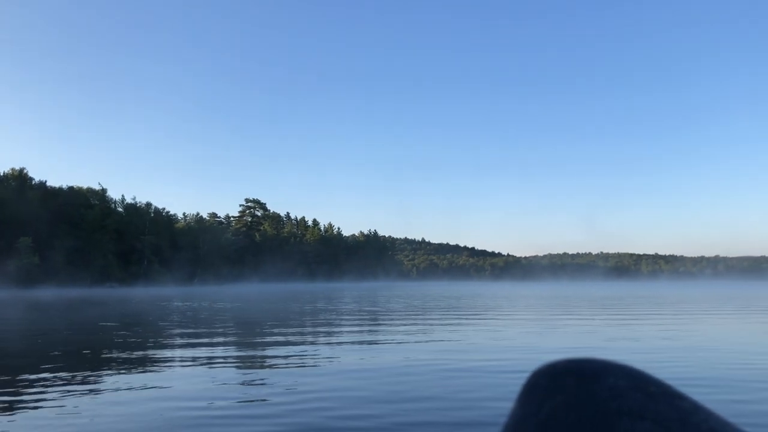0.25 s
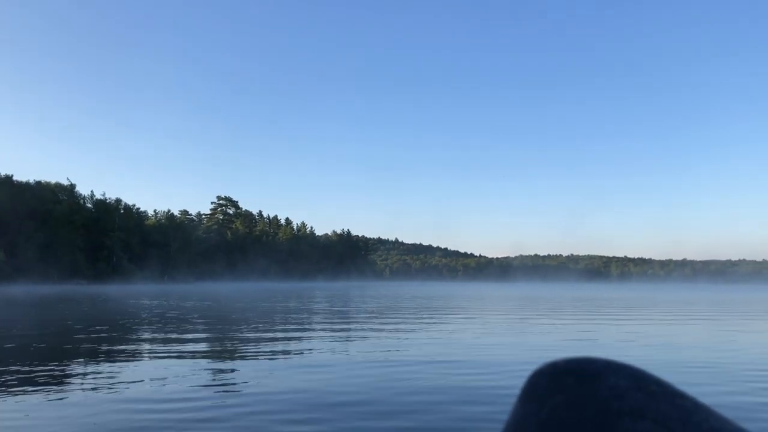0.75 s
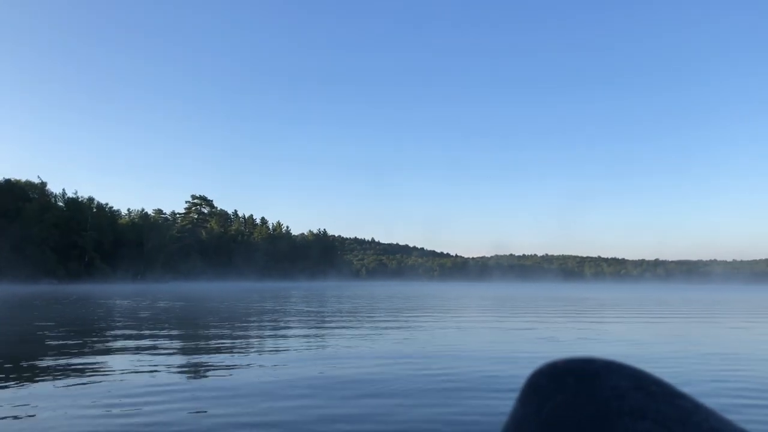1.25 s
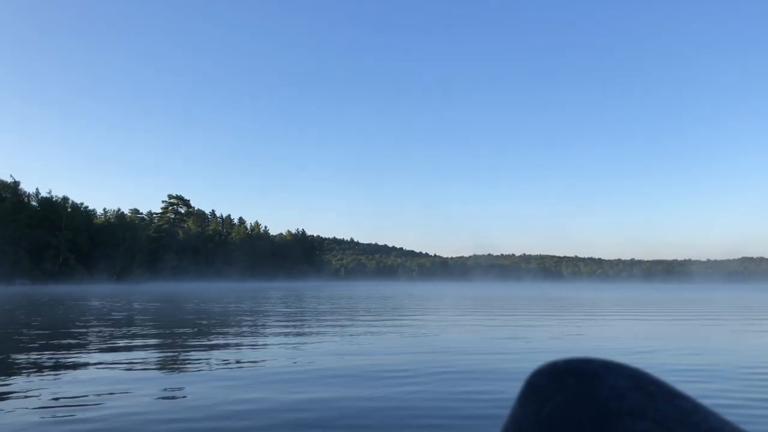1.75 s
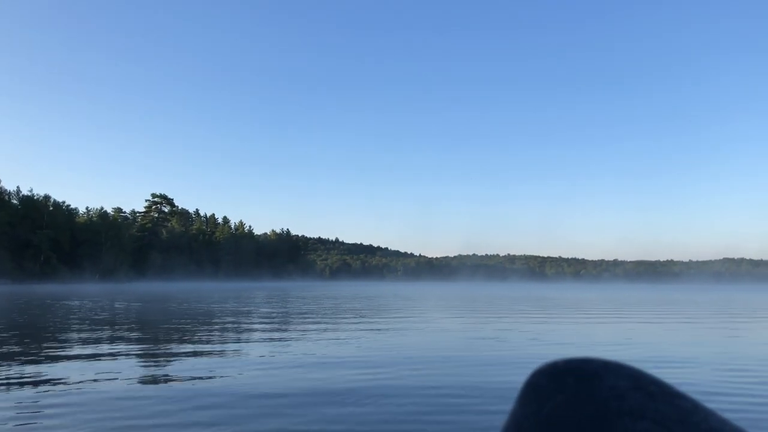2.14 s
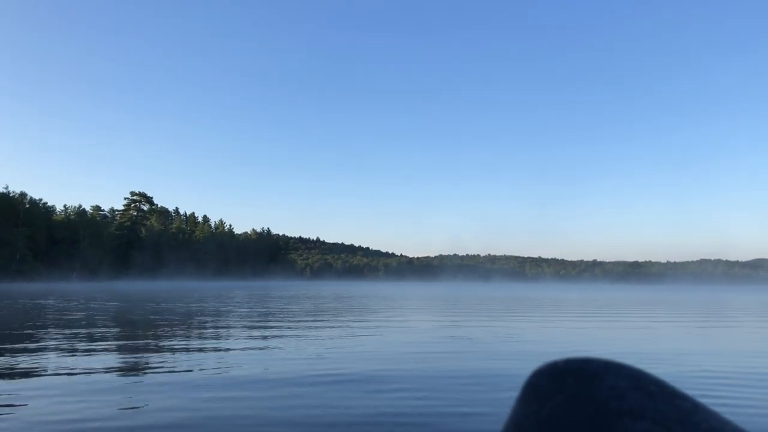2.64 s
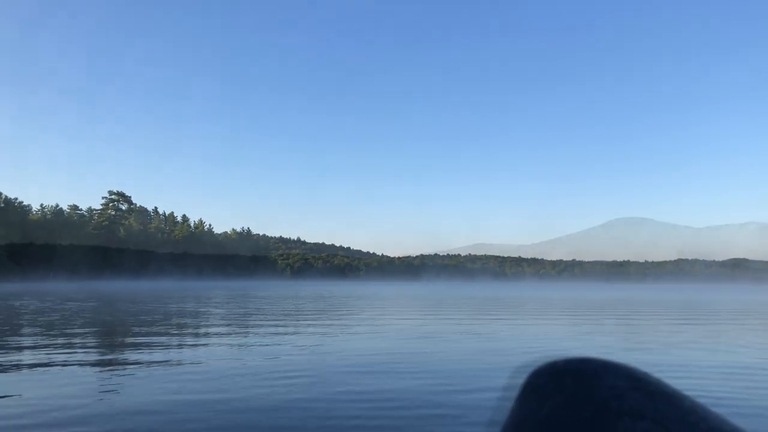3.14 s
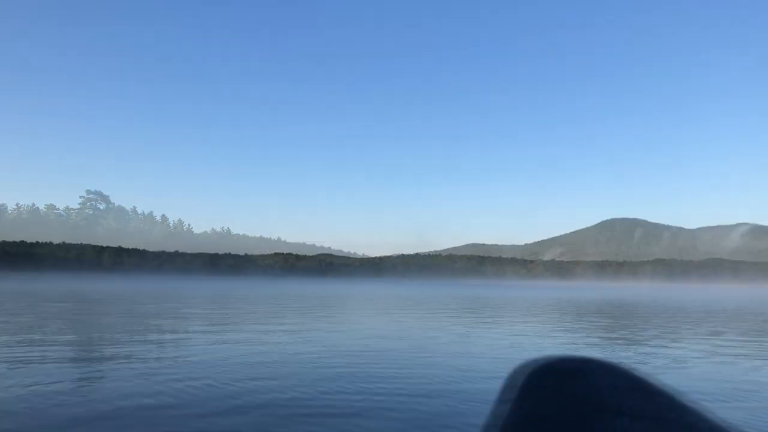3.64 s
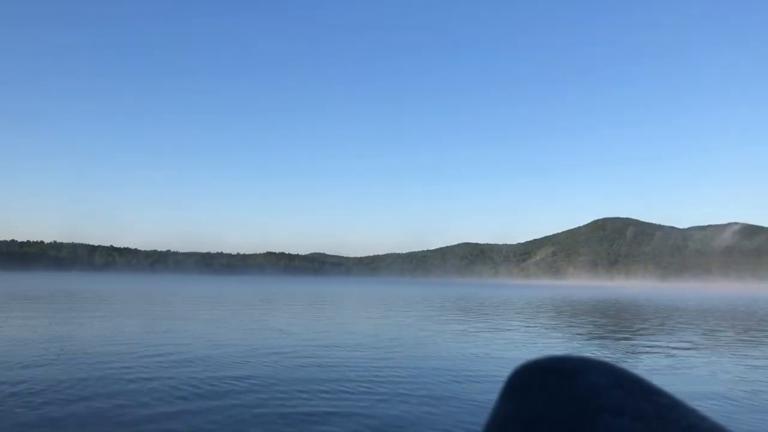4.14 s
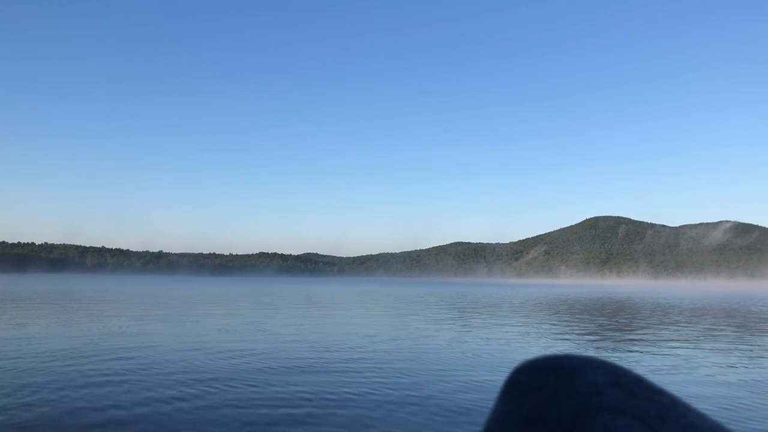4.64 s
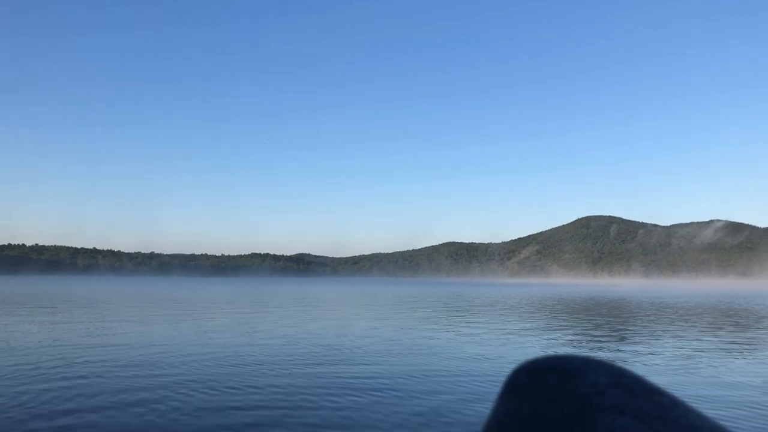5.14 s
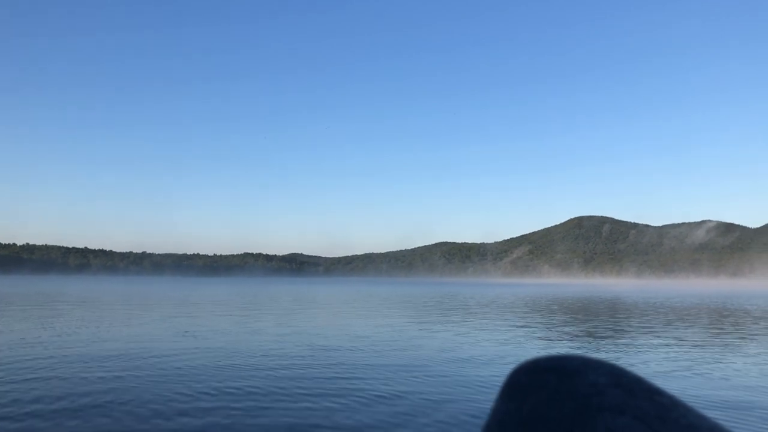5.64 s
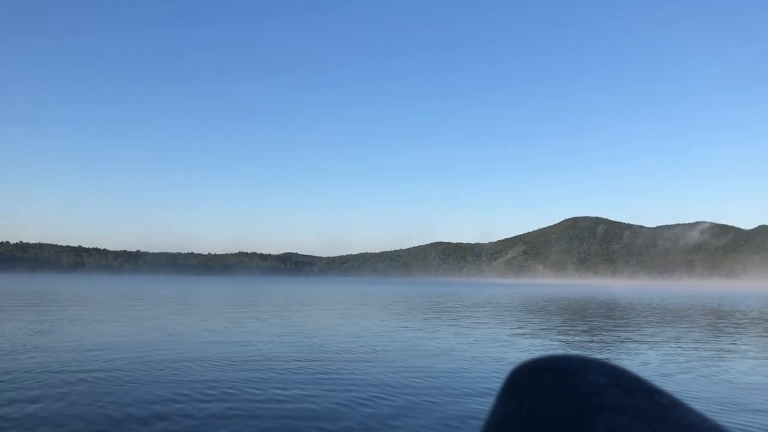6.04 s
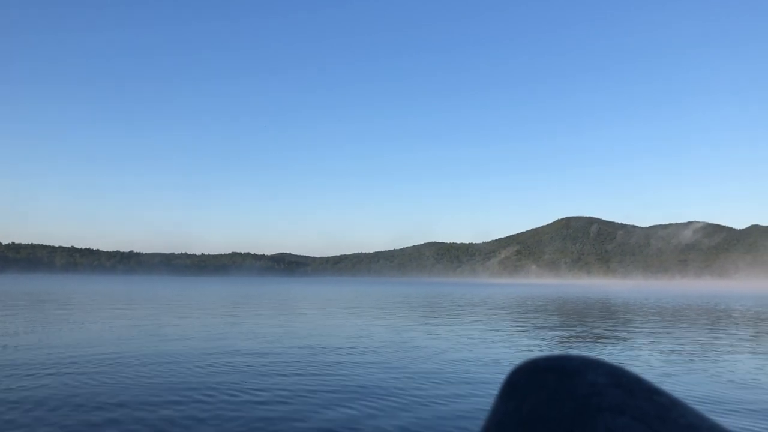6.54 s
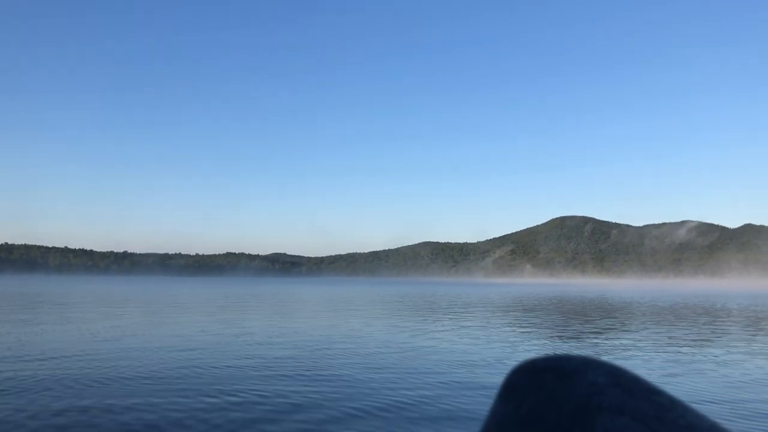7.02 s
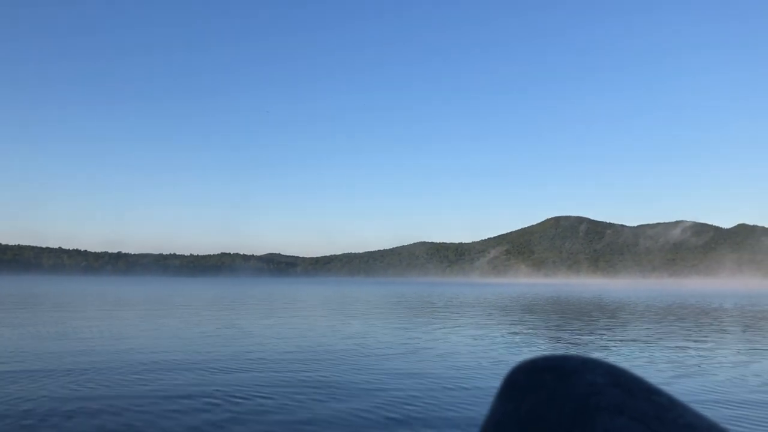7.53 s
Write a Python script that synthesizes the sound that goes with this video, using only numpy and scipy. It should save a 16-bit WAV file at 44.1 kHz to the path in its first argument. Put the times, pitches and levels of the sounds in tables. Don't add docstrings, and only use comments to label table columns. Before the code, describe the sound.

Distant loon tremolos and soft hull gurgles on a quiet lake, a lull, then close, yelping, laughing-like loon calls echoing from the wooded shore.

```python
import sys
import numpy as np
from scipy import signal
from scipy.fft import rfft, irfft, next_fast_len
from scipy.io import wavfile
from scipy.ndimage import uniform_filter1d, map_coordinates

SR = 44100
rng = np.random.default_rng(int(sys.argv[2]) if len(sys.argv) > 2 else 0)


def master(y):
    cut = np.clip(np.atleast_2d(y).T, -1, 1)
    pcm = np.round(cut * 32767)
    wavfile.write(sys.argv[1], SR, pcm.astype(np.int16))


def how_loud(loudness_db):
    steps = np.asarray(loudness_db, float) / 20
    return 10 ** steps


N = 343098

# t/s, f/Hz, level/dB, 2nd partial below it/dB
FAR_CALLS = [
    [(0, 1270, -44.5, -23), (.11, 1255, -53, -22), (.19, 1226, -56.5, -22), (.27, 1085, -70, -21)],
    [(.627, 1280, -53, -13), (.72, 1320, -53.5, -19.5), (.87, 1309, -56.5, -24), (.95, 1285, -67.5, -10),
     (1.11, 1296, -53.5, -23), (1.19, 1280, -55, -27), (1.26, 1265, -62, -22), (1.34, 1230, -58, -27),
     (1.38, 1180, -66, -16)],
    [(1.83, 1265, -62, -18), (1.98, 1293, -67, -12), (2.06, 1276, -52, -21), (2.15, 1233, -60, -8.5),
     (2.23, 1160, -59.5, -13), (2.33, 1090, -70, -12)],
]
# t/s, f/Hz, level/dB, 2nd partial below it/dB, throat resonance f/Hz
NEAR_CALLS = [
    [(4.574, 1375, -38.5, -31, 3900), (4.68, 1433, -36, -37, 4600), (4.83, 1423, -36.5, -43, 4480),
     (4.91, 1425, -36, -44, 4680), (4.98, 1401, -41.5, -34, 4600), (5.13, 1306, -43.5, -32, 4100),
     (5.166, 1242, -52, -30, 4000)],
    [(5.559, 1410, -37, -31, 4360), (5.76, 1426, -36, -33.5, 3940), (5.95, 1410, -34.8, -29.5, 3640),
     (6.03, 1399, -34.5, -40, 3400), (6.13, 1392, -36.5, -25.5, 3420), (6.21, 1382, -38.5, -32.5, 3570),
     (6.3, 1310, -42, -38, 3620), (6.36, 1208, -45.5, -44, 3580), (6.378, 1115, -60, -28, 3600)],
    [(6.701, 1366, -40.5, -18, 4180), (6.79, 1410, -37, -22, 4340), (6.94, 1418, -33.5, -33, 4770),
     (7.09, 1378, -37, -27, 4380), (7.18, 1359, -37, -24, 3470), (7.31, 1296, -39, -31, 3420),
     (7.37, 1133, -48, -33, 3417), (7.422, 1110, -50, -31, 3300)],
]
# t of one dip/s, waver period/s, t the beak opens/s
WAVER_TIMES = [
    (.068, .077, .3),
    (.676, .0783, 1.4),
    (1.945, .0818, 2.3),
    (4.645, .0746, 5.17),
    (5.578, .0739, 6.295),
    (6.752, .0751, 7.19),
]
# dip depth/dB, slack pitch f/Hz
WAVER_DEPTHS = [(9.5, 1040), (14, 1110), (11, 1050), (10.5, 1125), (8.5, 1130), (6.5, 1125)]
# t/s, level/dB
LINGER_LEVEL = [(0, -63), (.22, -60), (.45, -68), (.8, -65), (1.26, -60), (1.74, -66.5), (2.1, -63),
                (2.7, -68), (3.33, -71.5), (3.75, -82.5), (4.0, -100)]
# f/Hz, level per Hz/dB
LINGER_COLOUR = [(620, -27.5), (1050, -14), (1210, 8.5), (1290, 11), (1360, 5), (1440, -34), (1500, -25),
                 (1950, -51), (3300, -120)]
# t/s, level/dB
WATER_STIR = [(0.0, -58.5), (0.17, -57.5), (0.91, -61), (1.9, -57.5), (3.07, -63.5), (3.1, -61),
              (3.59, -69.5), (4.12, -65), (4.16, -69), (4.48, -66.5), (7.65, -67), (7.78, -67)]
# f/Hz, level per Hz/dB
HULL_COLOUR = [(25, -38), (45, -18), (70, -2), (110, -6.5), (160, -13.5), (300, -41), (600, -120)]
# f/Hz, level per Hz/dB
SWELL_COLOUR = [(12, -51), (25, -23.5), (35, -8.5), (48, -4), (65, 1), (100, -35), (200, -120)]
# f/Hz, level per Hz/dB
GURGLE_COLOUR = [(50, -43), (90, -11.5), (160, 1.5), (230, -1.5), (310, -2), (420, -8), (700, -42),
                 (1400, -120)]
# f/Hz, level per Hz/dB
WASH_COLOUR = [(100, -120), (200, -32.5), (350, 0), (500, -0.5), (630, 0), (780, -2.5), (1000, -9),
               (1400, -17.5), (2500, -30.5), (6000, -120)]
# t/s, level/dB
HISS_LEVEL = [(0, -69.5), (3.1, -69.5), (3.55, -73), (4.1, -70), (7.78, -69.5)]
# f/Hz, level per Hz/dB
HISS_COLOUR = [(300, -25), (600, -16.5), (1000, 9), (1700, 5), (2500, 5.5), (5000, 2), (10200, -3),
               (11400, -3), (14300, -4.5), (15050, 3), (15400, -9), (17000, -14.5)]
# delay/s, rise/s, t60/s, level/dB, treble edge f/Hz, pitch drop f/Hz of shores the bird flies away from
SHORE_ECHOES = [
    (0.0043, 0.0033, 0.069, -19, 5800, 2),
    (0.426, 0.02, 0.38, -23, 2400, -1),
    (0.4, .1, 4.5, -26.5, 1970, 1),
    (0.24, 0.19, 4.5, -25.5, 1420, 94.5),
]
# t/s, length/s, start f/Hz, end f/Hz, level/dB
CHIRPS = [(.22, 0.02, 2420, 2480, -72), (0.277, .05, 2570, 2620, -77), (0.405, 0.049, 2630, 2710, -71.5),
          (.85, .006, 3600, 2500, -70), (.851, 0.0077, 2540, 2360, -61), (1.468, 0.015, 3780, 3690, -77),
          (1.512, 0.016, 4150, 4380, -78), (1.532, .02, 3330, 3000, -75), (1.552, .02, 2590, 2700, -72),
          (1.61, .047, 2800, 2540, -75), (1.674, .063, 2700, 2890, -76.5), (1.743, .041, 3250, 2380, -74.5),
          (1.785, 0.027, 3020, 3130, -76.5), (2.935, 0.021, 3220, 2900, -72),
          (2.954, 0.016, 2880, 3260, -70.5), (3.064, 0.055, 3480, 2560, -74),
          (3.106, 0.045, 2450, 3340, -72), (3.143, 0.045, 3270, 2200, -69), (3.324, .018, 2700, 3250, -77),
          (3.354, .03, 3230, 2700, -78), (4.34, .031, 4130, 4670, -75), (5.957, 0.028, 2230, 2640, -71),
          (6.02, 0.045, 2670, 2120, -73), (7.481, .066, 2214, 2200, -79)]
# t/s, length/s, start f/Hz, end f/Hz, peak level/dB
SHORT_YELPS = [
    (0.595, 0.037, 1370, 2080, -53.5),
    (1.792, 0.038, 1610, 1900, -60.5),
    (5.526, .034, 1529, 2115, -39.5),
    (6.676, .026, 1444, 1990, -42),
]
# t/s, f/Hz, level/dB
HELD_YELP = [(4.476, 1493, -67), (4.49, 1458, -54), (4.505, 1596, -50.5), (4.518, 1770, -43),
             (4.534, 1844, -41), (4.548, 1840, -44), (4.564, 1757, -44), (4.572, 1840, -48.5)]
# multiple of the fundamental, level/dB
YELP_PARTIALS = [(1, -17.5), (2, -1), (3, -32), (4, -27), (5, -24), (6, -31)]
# added fundamental level/dB, added overtone level/dB
YELP_TILTS = [(12, -7), (11, -7), (-4, -11), (-4, -10), (-1, -5)]
# t/s, f/Hz, length/s, peak level/dB
SLAPS = [(0.908, 92.0, 0.0047, -41.5), (1.515, 88.5, 0.021, -62), (1.824, 70.4, 0.016, -42.5),
         (2.249, 100, 0.0084, -41.5), (2.416, 69.5, 0.0072, -45), (2.489, 79, 0.0048, -38),
         (2.641, 99.0, 0.007, -54), (2.867, 70, 0.0061, -43.5), (2.91, 84.0, 0.018, -48.5),
         (3.094, 84.5, 0.0093, -49), (3.159, 70.0, 0.011, -49.6), (3.225, 87.0, 0.01, -45),
         (3.279, 100, 0.0056, -43.5), (3.356, 116, 0.013, -48.5), (3.74, 74.4, 0.0066, -46),
         (4.923, 71, 0.0055, -44.5), (7.674, 145.8, 0.013, -51.5)]
# t/s, length/s, start f/Hz, end f/Hz, level/dB
VOICE_BREAKS = [
    (4.485, .017, 2850, 3180, -73),
    (4.496, 0.015, 3150, 2600, -74),
    (4.58, 0.019, 1610, 1770, -57),
    (5.17, .007, 1863, 1510, -66),
    (5.173, 0.017, 1540, 1370, -56),
]
# t/s, f/Hz, level/dB
MOTOR_RUNS = [
    [(4.9, 69, -69), (5.66, 83.13, -67.5), (7.78, 89.55, -62.5)],
]


def unit(x):
    return x / np.sqrt(np.mean(x ** 2) + 1e-20)


def span(rows):
    s, *columns = np.transpose(rows)
    n = np.arange(max(round(s[0] * SR), 0), min(round(s[-1] * SR), N))
    return n, [np.interp(n / SR, s, column) for column in columns]


def level_curve(rows):
    s, db = np.transpose(rows)
    return np.interp(np.arange(N) / SR, s, db)


def wobble(rate):
    knots = rng.standard_normal(int(N * rate / SR) + 4)
    return map_coordinates(knots, [np.arange(N) * rate / SR])


def rush(colour, patchy_db):
    z = signal.stft(rng.standard_normal(N + 512), nperseg=512)[2]
    field = uniform_filter1d(rng.standard_normal(z.shape), size=5, axis=0)
    field = uniform_filter1d(field, size=12, axis=1)
    noise = signal.istft(z * how_loud(patchy_db * unit(field)), nperseg=512)[1]
    f, db = np.transpose(colour)
    m = next_fast_len(len(noise))
    gain = how_loud(np.interp(np.log(np.fft.rfftfreq(m, 1 / SR) + 1), np.log(f + 1), db))
    return unit(irfft(rfft(noise, m) * gain, m)[:N])


def add(out, n, hz, partials, edge):
    turn = 2 * np.pi * np.cumsum(hz) / SR
    ends = np.clip(np.minimum(n - n[0], n[-1] - n) / (edge * SR), 0, 1)
    voice = sum(how_loud(db) * np.sin(k * turn + k) for k, db in partials)
    out[n] += ends * np.sqrt(2) * voice


def resonance(hz, centre_hz, width_hz):
    return -20 * np.log10(1 + ((hz - centre_hz) / width_hz) ** 2)


def tremolos():
    level_lag_s = 0.0015
    swing, full_swing_hz = 0.6, 85
    pitch_round, level_round = 1.05, 1.25
    third_db, throat_width_hz = -27.5, 303
    fourth_db, beak_hz, beak_width_hz = -46.5, 4860, 450
    beak_open_db, beak_open_s = 15, 0.03
    out, flutter_db = np.zeros(N), 0.3 * wobble(60)
    fading_db = [2.07 * wobble(40) for _ in range(3)]
    far_throat_hz = 3770
    far = [[row + (far_throat_hz,) for row in call] for call in FAR_CALLS]
    for rows, (dip_s, period, open_s), (depth_db, slack_hz) in zip(far + NEAR_CALLS, WAVER_TIMES, WAVER_DEPTHS):
        n, (crest_hz, crest_db, second_db, throat_hz) = span(rows)
        t = n / SR
        arch = np.abs(np.sin(np.pi * (t - dip_s) / period))
        late_arch = np.abs(np.sin(np.pi * (t - dip_s - level_lag_s) / period))
        swing_hz = swing * np.maximum(crest_hz - slack_hz, 0)
        hz = crest_hz - swing_hz * (1 - arch ** pitch_round)
        hz = uniform_filter1d(hz, size=400, mode="nearest")
        sink_db = depth_db * np.minimum(swing_hz / full_swing_hz, 1) * (1 - late_arch ** level_round)
        db = uniform_filter1d(crest_db - sink_db, size=300, mode="nearest") + flutter_db[n]
        beak_db = fourth_db + beak_open_db * np.clip((t - open_s) / beak_open_s, 0, 1)
        upper = [second_db - 10 * (1 - arch),
                 third_db + resonance(3 * hz, throat_hz, throat_width_hz),
                 beak_db + resonance(4 * hz, beak_hz, beak_width_hz)]
        stack = [(j + 2, crest_db + level + fading_db[j][n]) for j, level in enumerate(upper)]
        add(out, n, hz, [(1, db)] + stack, edge=0.0014)
    return out


def linger():
    db = level_curve(LINGER_LEVEL) + 1.5 + 1.24 * wobble(25.96)
    return how_loud(db) * rush(LINGER_COLOUR, patchy_db=0.0)


def water():
    wash_db = level_curve(WATER_STIR)
    stir_db = wash_db - wash_db.mean()
    hull_db = -62 + 0.4 * stir_db
    gurgle_db = -61.5 + 0.6 * stir_db
    lap, rock = wobble(9), wobble(11)
    out = how_loud(hull_db - 2.5) * unit(how_loud(1.5 * rock) * rush(HULL_COLOUR, patchy_db=0.8))
    swell_db = hull_db + 0.8 * (wash_db + 58.5) - 4
    out += how_loud(swell_db) * unit(how_loud(3.7 * rock) * rush(SWELL_COLOUR, patchy_db=1.5))
    out += how_loud(gurgle_db + 0.5 + 0.37 * lap + 0.2 * rock) * rush(GURGLE_COLOUR, patchy_db=0.53)
    out += how_loud(wash_db + 0.17 * lap) * rush(WASH_COLOUR, patchy_db=1.56)
    return out


def air():
    return how_loud(level_curve(HISS_LEVEL)) * rush(HISS_COLOUR, patchy_db=0.3)


def shore(birds):
    t, out = np.arange(3 * SR) / SR, np.zeros(N)
    turning = signal.hilbert(birds, next_fast_len(N))[:N]
    for delay, rise, t60, db, edge_hz, drop_hz in SHORE_ECHOES:
        u = np.maximum(t - delay, 0)
        decay_db = -60 * u / t60 + 2.8 * wobble(24)[:len(t)]
        tail = (1 - np.exp(-u / rise)) * how_loud(decay_db) * rng.standard_normal(len(t))
        dull = signal.butter(4, edge_hz, fs=SR, output="sos")
        tail = signal.sosfilt(dull, tail / np.linalg.norm(tail))
        heard = np.real(turning * np.exp(-2j * np.pi * drop_hz * np.arange(N) / SR))
        out += how_loud(db) * signal.fftconvolve(heard, tail)[:N]
    return out


def whistles(rows, shimmer):
    out = np.zeros(N)
    for s, length, from_hz, to_hz, db in rows:
        n = round(s * SR) + np.arange(round(length * SR))
        add(out, n, np.linspace(from_hz, to_hz, len(n)), [(1, db + 3 * shimmer[n])], edge=length * 0.25)
    return out


def chirps(shimmer):
    return whistles(CHIRPS, shimmer)


def yelp_rows(s, length, from_hz, to_hz, db):
    peak, rise_db, fall_db = 0.6, 11, 15
    u = np.linspace(0, 1, num=12)
    rising = rise_db * (1 - u / peak) ** 2
    falling = fall_db * ((u - peak) / (1 - peak)) ** 2
    loss_db = np.where(u < peak, rising, falling)
    return np.transpose([s + length * u, from_hz + (to_hz - from_hz) * u ** 1.65, db - loss_db])


def yelps():
    out = np.zeros(N)
    tracks = [yelp_rows(*yelp) for yelp in SHORT_YELPS] + [HELD_YELP]
    for rows, (low_db, high_db) in zip(tracks, YELP_TILTS):
        n, columns = span(rows)
        hz, db = uniform_filter1d(columns, size=150, mode="nearest")
        partials = [(k, db + rel_db + low_db * (k < 2) + high_db * (k > 2)) for k, rel_db in YELP_PARTIALS]
        add(out, n, hz / 2, partials, edge=0.00071)
    return out


def slaps():
    out, t = np.zeros(N), np.arange(-4000, 4000) / SR
    phases = rng.uniform(0, 2 * np.pi, len(SLAPS))
    for (s, hz, length, db), phase in zip(SLAPS, phases):
        thud = np.exp(-(t / (0.85 * length)) ** 2) * np.cos(2 * np.pi * hz * t + phase)
        out[round(s * SR) - 4000:][:len(t)] += how_loud(db) * thud
    return out


def voice_breaks(shimmer):
    return whistles(VOICE_BREAKS, shimmer)


def motor():
    out = np.zeros(N)
    n, (hz, db) = span(MOTOR_RUNS[0])
    db = db + 0.6 * wobble(7)[n]
    hz = hz * (1 + 0.02 * wobble(9.8)[n])
    add(out, n, hz, [(1, db), (2, db - 9.5)], edge=0.31)
    return out


def scene():
    shimmer = wobble(90)
    birds = tremolos() + chirps(shimmer) + yelps() + voice_breaks(shimmer)
    lake = linger() + water() + slaps()
    return (birds + shore(birds) + lake + air() + motor())[None]


def top_cut(x):
    return signal.sosfilt(signal.butter(12, 15890, fs=SR, output="sos"), x)


def record(dry):
    return top_cut(dry)


dry = scene()
out = record(dry)
master(out)
```